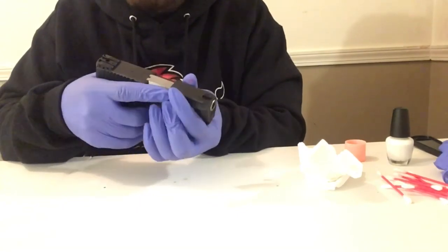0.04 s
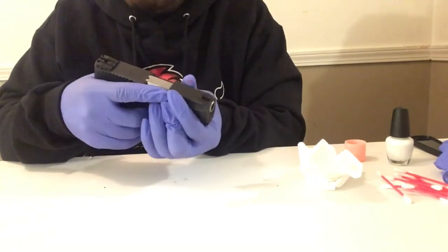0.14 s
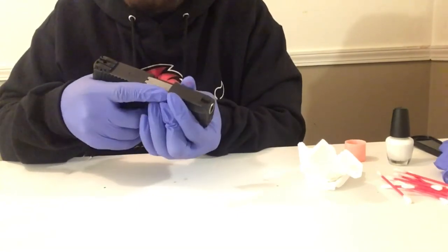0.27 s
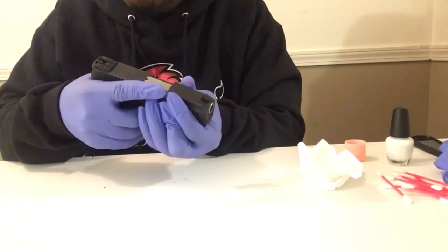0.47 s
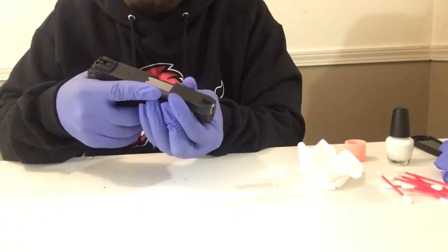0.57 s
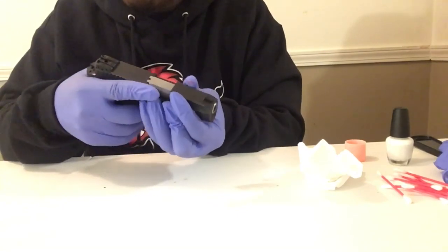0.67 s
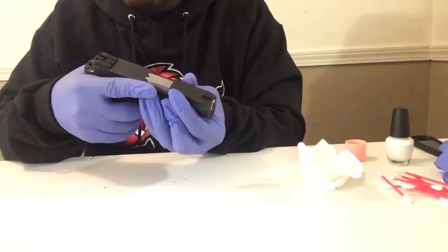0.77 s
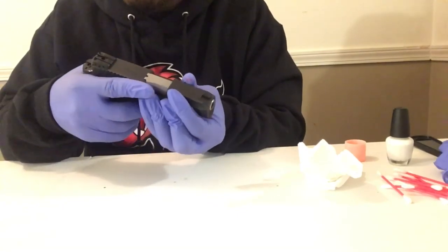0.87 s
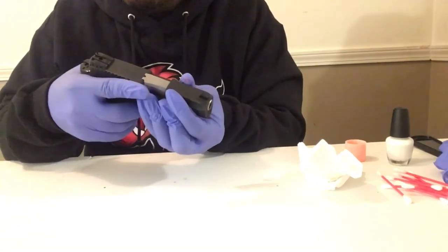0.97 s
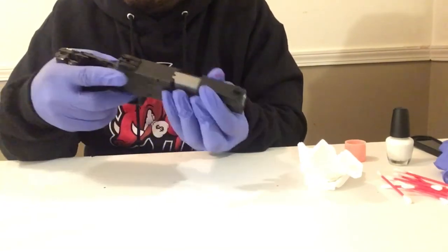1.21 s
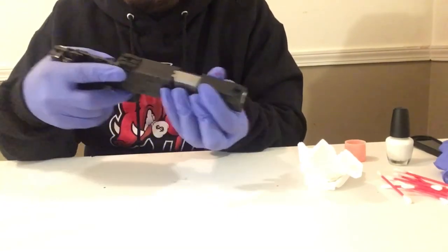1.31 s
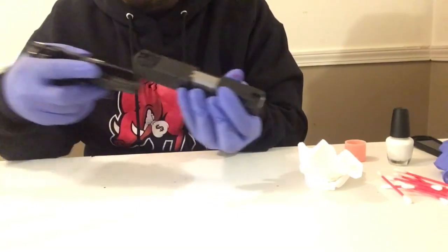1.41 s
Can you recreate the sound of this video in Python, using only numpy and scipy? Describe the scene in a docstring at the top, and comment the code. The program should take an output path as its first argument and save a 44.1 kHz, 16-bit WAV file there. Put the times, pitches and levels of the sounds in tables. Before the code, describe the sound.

Pistol disassembly at a table, sharp metallic snap, small click, then rattling slide clacks over low hum

```python
"""Taking a pistol apart in a humming room

Gloved hands work at a table: the striker snaps forward and rebounds, the takedown catch clicks, then the
slide clacks free, the barrel knocks inside it and it scrapes off its rails. Contacts are noise cracks
plus damped modes, sliding is a train of random slips, and hum and air are sines and shaped noise.
The recorder ducks after the loudest blows."""
import sys
import numpy as np
from scipy import signal
from scipy.fft import rfft, irfft, next_fast_len
from scipy.io import wavfile
from scipy.ndimage import uniform_filter1d, map_coordinates

SR = 44100
rng = np.random.default_rng(int(sys.argv[2]) if len(sys.argv) > 2 else 0)


def int16_out(signal):
    """Quantize to a 16-bit WAV file."""
    q = np.round(np.clip(np.atleast_2d(signal).T, -1, 1) * 32767)
    wavfile.write(sys.argv[1], SR, q.astype(np.int16))


N = 63945  # samples


def amp(db):
    """Level to gain: 20 dB is a factor of ten in amplitude."""
    return 10 ** (np.asarray(db) / 20)


def unit(x):
    """Power normalisation: scale to rms 1."""
    return x / np.sqrt(np.mean(x ** 2) + 1e-20)


def blow(x):
    """Energy normalisation: scale to the energy of 5 ms at rms 1."""
    return x * np.sqrt(.005 * SR / np.sum(x ** 2))


def along(points, hz):
    """Log-frequency interpolation between (freq_hz, value) points."""
    freq_hz, value = np.transpose(points)
    return np.interp(np.log(hz + 1), np.log(freq_hz + 1), value)


def coloured(x, points, tilt_db=0):
    """Minimum-phase filter: a folded cepstrum gives the spectrum, tilted in dB per octave above 1 kHz."""
    m = 2 * next_fast_len(len(x))
    hz = np.fft.rfftfreq(m, 1 / SR)
    gain_db = along(points, hz) + tilt_db * np.log2(np.maximum(hz, 1000))
    cepstrum = irfft(np.log(amp(gain_db)))
    cepstrum[1:m // 2] *= 2
    cepstrum[m // 2 + 1:] = 0
    return irfft(rfft(x, m) * np.exp(rfft(cepstrum)), m)[:len(x)]


def fade(t, t60):
    """Exponential decay: the amplitude falls 60 dB in t60 seconds."""
    return np.exp(-np.log(1000) * t / t60)


def add(track, start_s, x):
    """Superposition: mix x into the track from start_s."""
    part = track[max(round(start_s * SR), 0):][:len(x)]
    part += x[:len(part)]


def sine(hz, t):
    """Pure tone of rms 1 with a random phase."""
    return np.sqrt(2) * np.sin(2 * np.pi * (hz * t + rng.random()))


# appliance hum, low line: start_s, level_db (rms)
MOTOR_LEVEL = [(0, -46.5), (.09, -47), (.2, -49), (.32, -62.5), (.41, -47.5), (.62, -54), (.79, -74.5),
               (.96, -65.5), (1.2, -53.5), (1.43, -44.5)]
MOTOR_HZ = 58.8
# appliance hum, upper lines: pitch_hz, level_db (rms, before the waver)
HUM_LINES = [(119, -55), (177, -68), (209.9, -66), (328.4, -62), (597.5, -67), (721.4, -70), (1017, -70),
             (1109, -69)]
# spectrum of the room noise: freq_hz, density_db (relative, per Hz)
AIR_COLOUR = [(20, -32), (35, -14), (58, -4.5), (87, -7.5), (145, -13), (270, -12.5), (400, -13.5),
              (460, -19.5), (600, -18.5), (850, -26.5), (1150, -21.5), (1600, -31.5), (2600, -40),
              (8000, -43.5), (12000, -46.5), (16000, -54.5)]
AIR_DB = -52.5  # rms


def background():
    """Tonal and broadband noise: steady-pitched hum lines of wavering level over soft room noise."""
    t = np.arange(N) / SR
    air = amp(AIR_DB) * unit(coloured(rng.standard_normal(N), AIR_COLOUR))
    out = air + amp(np.interp(t, *np.transpose(MOTOR_LEVEL))) * sine(MOTOR_HZ, t)
    for pitch_hz, level_db in HUM_LINES:
        # random values, 9 per second, smoothly joined
        waver = map_coordinates(rng.standard_normal(64), [t * 9], mode="mirror")
        out += amp(level_db + 2 * waver) * sine(pitch_hz, t)
    return out


# parts sliding on each other: middle_s, length_s, level_db, brightness_db_per_octave
RUBS = [(0.093, 0.23, -87, 2), (0.153, 0.013, -63, 3), (0.73, 0.12, -66.5, -2), (0.994, 0.044, -56.5, -4.5),
        (1.252, 0.026, -49.5, -2.5), (1.277, 0.028, -51.5, -1)]
# spectrum of the slips: freq_hz, density_db (relative, per Hz)
RUB_COLOUR = [(200, -13), (600, 0), (1800, -0.5), (2600, -5), (4500, -5.5), (7000, -7), (9500, -4.5),
              (11800, -15), (13000, -5), (14400, -4.5), (15300, -20.5)]
GRAINS_PER_S, GRAIN_SPREAD_DB = 4200, 4  # mean rate, standard deviation of slip size


def rubs():
    """Friction: many tiny slips of uneven size swell and fade with each stroke."""
    out, t = np.zeros(N), np.arange(N) / SR
    for middle_s, length_s, level_db, tilt_db in RUBS:
        happens = rng.random(N) < GRAINS_PER_S / SR
        size = amp(GRAIN_SPREAD_DB * rng.standard_normal(N))
        slips = happens * size * rng.choice([-1, 1], N)
        stroke = np.exp(-(2 * (t - middle_s) / length_s) ** 2)
        out += amp(level_db) * stroke * unit(coloured(slips, RUB_COLOUR, tilt_db))
    return out


# small shifts of the grip: start_s, level_db, brightness_db_per_octave
TICKS = [(.0105, -55.5, -12), (.02, -63, 0.5), (.095, -64.5, 6), (.136, -62.5, 2), (.174, -59, 1),
         (.713, -65.5, -2)]
# spectrum of a tick: freq_hz, density_db (relative, per Hz)
TICK_COLOUR = [(500, -18), (3500, -8.5), (6500, -3), (9000, -6), (12000, -20.5), (16000, -27.5)]
TICK_T60 = .015  # s


def ticks():
    """Transient excitation: faint dry noise bursts as glove and parts shift."""
    out, t = np.zeros(N), np.arange(SR // 20) / SR
    for start_s, level_db, tilt_db in TICKS:
        burst = rng.standard_normal(len(t)) * fade(t, TICK_T60)
        add(out, start_s, amp(level_db) * blow(coloured(burst, TICK_COLOUR, tilt_db)))
    return out


RING_WIDTH_HZ = 32  # line width added to a mode at 4 kHz, in proportion to pitch elsewhere


def ring(modes, t, scatter_db=2.5):
    """Modal superposition: damped modes, struck unevenly; the loose fit blurs their pitch."""
    step = np.sqrt(2 * np.pi * RING_WIDTH_HZ / SR)
    drift = np.cumsum(rng.standard_normal((len(modes), len(t))), axis=1) * step
    out = np.zeros(len(t))
    for (pitch_hz, level_db, t60), blur in zip(modes, drift):
        strength = amp(level_db + scatter_db * rng.normal())
        phase = 2 * np.pi * (pitch_hz * t + rng.random()) + blur * np.sqrt(pitch_hz / 4000)
        out += strength * fade(t, t60) * np.sin(phase)
    return blow(out)


def strikes(contacts, body, modes, attack_s):
    """Impact: each contact is a brief chattering crack together with the ring of the part."""
    out, t = np.zeros(N), np.arange(SR // 2) / SR
    onset = 1 - np.exp(-t / attack_s)
    for start_s, level_db, tilt_db, t60, ring_db in contacts:
        chatter = rng.choice([-1, 1], len(t)) * fade(t, t60)
        crack = blow(coloured(chatter, body, tilt_db))
        # a flat spectrum, so that only half the tilt shapes the ring
        tone = blow(coloured(ring(modes, t), [(1000, 0)], tilt_db / 2))
        add(out, start_s, amp(level_db) * (crack + amp(ring_db) * tone) * onset)
    return out


# striker contacts: start_s, level_db, brightness_db_per_octave, crack_t60_s, ring_db (re crack)
STRIKER_CONTACTS = [(.1997, -48.5, 9, .015, -12.5), (.2057, -45.5, 6.5, 0.0076, -11),
                    (.212, -48, 2, .012, -6), (.2209, -22.5, -1, 0.067, -3.5),
                    (.2236, -6.5, 1.2, 0.025, -10.5), (.2294, -5, -0.5, 0.021, -8),
                    (.2348, -9.5, 0, 0.022, -5), (.2523, -22.5, 8, .008, -8.5),
                    (.2578, -18.5, 1.5, 0.0056, -5)]
# spectrum of its crack: freq_hz, density_db (relative, per Hz)
STRIKER_BODY = [(100, -8), (700, -8), (1600, -9), (2700, -2.5), (4200, -9), (6500, -12.5), (8000, -7.5),
                (9100, 0.5), (10000, -13.5), (11400, 0), (13500, -9.5), (16000, -18.5)]
# its ringing: pitch_hz, level_db (relative), t60_s
STRIKER_MODES = [(2524, -2, 0.16), (2730, -3, 0.076), (2950, -6, 0.18), (3135, -2.5, 0.16),
                 (3398, -5.5, 0.13), (4625, -6, 0.16), (7500, -16, 0.15), (8775, -11, 0.064),
                 (9260, -12, 0.17), (9460, -7.5, .16), (9870, -9, .18), (10670, -7, 0.18),
                 (11165, -1.5, 0.28), (10970, -8.5, 0.18), (11640, -10, 0.234), (12030, -7, .2),
                 (12500, -10, 0.13)]


def striker():
    """Impact and rebound: the striker snaps forward in a rapid run of contacts."""
    return strikes(STRIKER_CONTACTS, STRIKER_BODY, STRIKER_MODES, attack_s=0.0005)


# jolts of the plastic frame: start_s, level_db
FRAME_JOLTS = [(0.224, -17.5), (.2298, -29)]
# its low resonances: pitch_hz, level_db (relative), t60_s
FRAME_MODES = [(76, -6, .04), (165, -0.5, 0.026), (332, -3, .025), (550, 4, 0.031), (695, -1.5, 0.036),
               (837, -1.5, 0.034)]


def frame():
    """Heavily damped resonance: the dull knock of the grip as the striker jolts the frame."""
    out, t = np.zeros(N), np.arange(SR // 4) / SR
    onset = 1 - np.exp(-t / .001)
    knock = np.zeros(len(t))
    for pitch_hz, mode_db, t60 in FRAME_MODES:
        knock += amp(mode_db) * fade(t, t60) * np.sin(2 * np.pi * pitch_hz * t)
    for start_s, level_db in FRAME_JOLTS:
        add(out, start_s, amp(level_db) * blow(knock * onset))
    return out


# catch contacts: start_s, level_db, brightness_db_per_octave, crack_t60_s, ring_db (re crack)
CATCH_CONTACTS = [(.4372, -14, 9.5, 0.01, -16.5), (.4384, -11, -0.5, 0.0075, -13),
                  (.4462, -25.5, -0.5, 0.023, -16.5), (.4495, -32, 17, 0.018, -14),
                  (.5145, -35, 2.5, 0.024, -10.5)]
# spectrum of its crack: freq_hz, density_db (relative, per Hz)
CATCH_BODY = [(200, -31.5), (950, -24.5), (1350, -7), (1800, -6), (2100, -4.5), (2600, 6), (3150, -4),
              (4300, -4.5), (5200, -8.5), (7500, -9), (11500, -7), (15500, -22.5)]
# its ringing: pitch_hz, level_db (relative), t60_s
CATCH_MODES = [(1420, -4.5, 0.059), (1832, 3.5, 0.071), (2224, -7.5, 0.094), (2390, -8, .2),
               (2450, -5.5, 0.079), (4150, -2.5, 0.11), (9170, -11, 0.27), (11250, -6, 0.18),
               (12100, -9.5, 0.15), (12350, -12, .16)]


def catch():
    """Impact of a small part: the takedown catch clicks."""
    return strikes(CATCH_CONTACTS, CATCH_BODY, CATCH_MODES, attack_s=0.00036)


# slide contacts: start_s, level_db, brightness_db_per_octave, crack_t60_s, ring_db (re crack)
SLIDE_CONTACTS = [(1.0005, -24, 4.5, 0.022, -19), (1.011, -27, 1.5, 0.0295, -8.5),
                  (1.017, -10.5, 0.9, .012, -14.5), (1.0196, -15, -2.5, .018, -7.5),
                  (1.037, -31, -1.5, .012, -13), (1.0417, -25, -2, .012, -15),
                  (1.0597, -21.5, 7.5, 0.02, -13.5)]
# spectrum of its crack: freq_hz, density_db (relative, per Hz)
SLIDE_BODY = [(200, -44.5), (480, -22), (750, -23.5), (1100, -13), (1500, -3.5), (2400, -5), (3200, 2),
              (4500, -0.5), (6500, -7.5), (9500, -8), (13000, -10), (16000, -18.5)]
# its ringing: pitch_hz, level_db (relative), t60_s
SLIDE_MODES = [(1477, -2, 0.15), (1760, -5, 0.16), (1850, -9, 0.37), (3334, -2, 0.16), (3405, -6.5, 0.152),
               (4350, -5, 0.12), (7100, 0, 0.13), (9500, 1, .16), (10100, -9, 0.16), (13060, -18, 0.15)]


def slide():
    """Repeated impact: the slide clacks free in several contacts."""
    return strikes(SLIDE_CONTACTS, SLIDE_BODY, SLIDE_MODES, attack_s=0.00063)


# barrel contacts: start_s, level_db, brightness_db_per_octave, crack_t60_s, ring_db (re crack)
BARREL_CONTACTS = [(1.0915, -27.5, -2.9, .02, -6), (1.097, -24.5, 1.7, 0.029, -6.5)]
# spectrum of its crack: freq_hz, density_db (relative, per Hz)
BARREL_BODY = [(200, -15), (650, -14.5), (1000, -11.5), (1450, -4), (1900, 4.5), (2400, -17.5),
               (3200, -2.5), (4400, -6.5), (5800, -15), (9500, -19.5), (15000, -25)]
# its ringing: pitch_hz, level_db (relative), t60_s
BARREL_MODES = [(1474, -11, 0.072), (1735, 6, 0.17), (1784, -0.5, 0.28), (1857, -7.5, 0.59),
                (2150, -4, 0.11), (3270, 6.5, 0.15), (4250, -4, 0.14), (9360, -15, 0.56)]


def barrel():
    """Impact inside a shell: the barrel knocks twice within the slide and rings."""
    return strikes(BARREL_CONTACTS, BARREL_BODY, BARREL_MODES, attack_s=0.00015)


# reverberation time: freq_hz, t60_s
ROOM_T60 = [(200, 0.42), (1500, 0.36), (4000, 0.42), (9000, 0.38), (15000, 0.19)]
# spectrum of the reverberation: freq_hz, gain_db
ROOM_COLOUR = [(150, -20), (600, -23), (1300, 0.5), (2500, -4.5), (5000, -4.5), (10000, -4), (15000, 0)]
ROOM_BUILD_S = 0.0036


def room(x, wet_db):
    """Diffuse reverberation: wall echoes build up quickly; each frequency dies at its own speed."""
    noise = rng.standard_normal((SR * 3) // 4)
    hz, t, bands = signal.stft(noise, SR, nperseg=256)
    decay = fade(t, along(ROOM_T60, hz)[:, None])
    tail = signal.istft(bands * decay, SR, nperseg=256)[1]
    tail_s = np.arange(len(tail)) / SR
    tail = tail * (1 - np.exp(-(tail_s / ROOM_BUILD_S) ** 2))
    tail = coloured(tail / np.linalg.norm(tail), ROOM_COLOUR)
    return x + amp(wet_db) * signal.fftconvolve(x, tail)[:N]


def scene():
    """Superposition in one room: each group of parts faces the walls a little differently."""
    snap = striker() + frame()
    click = catch()
    clack = slide()
    handling = barrel() + rubs() + ticks()
    out = room(snap, wet_db=-8) + room(click, wet_db=-8)
    out += room(clack, wet_db=-7) + room(handling, wet_db=-8)
    return (out + background())[None]


LIMIT_DB, RECOVER_DB_PER_S = -11, 19
LOW_CUT_HZ, TOP_HZ = 44, 15900


def record(dry):
    """Limiting and band-limiting: gain ducks at once, recovers slowly; bass and treble extremes are cut."""
    power = np.abs(uniform_filter1d(dry[0] ** 2, size=128))
    level_db = 10 * np.log10(power + 1e-12)
    excess_db = np.maximum(level_db - LIMIT_DB, 0)
    # a running maximum on a rising ramp holds each peak and lets it sink at a steady rate
    recovery = RECOVER_DB_PER_S * np.arange(N) / SR
    duck_db = np.maximum.accumulate(excess_db + recovery) - recovery
    held = np.clip(dry * amp(-uniform_filter1d(duck_db, size=32)), -1, 1)
    low_cut = signal.butter(2, LOW_CUT_HZ, "high", fs=SR, output="sos")
    top_cut = signal.ellip(10, .1, 90, TOP_HZ, fs=SR, output="sos")
    return signal.sosfilt(top_cut, signal.sosfilt(low_cut, held))


dry = scene()
out = record(dry)
int16_out(out)
```